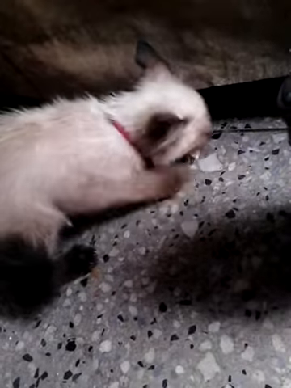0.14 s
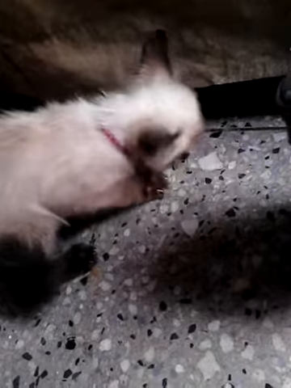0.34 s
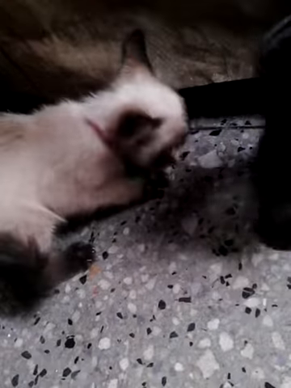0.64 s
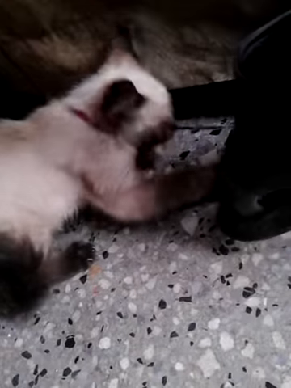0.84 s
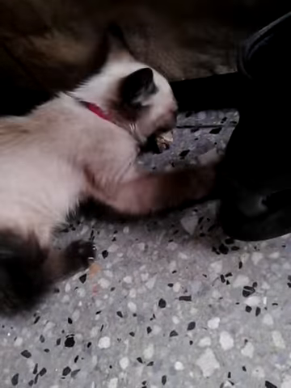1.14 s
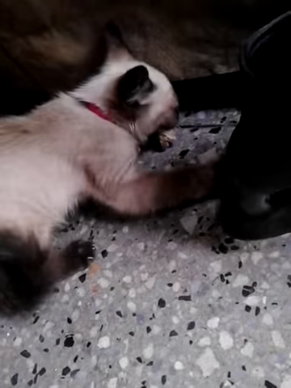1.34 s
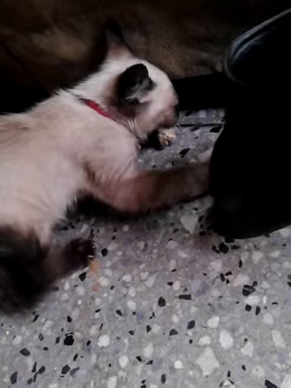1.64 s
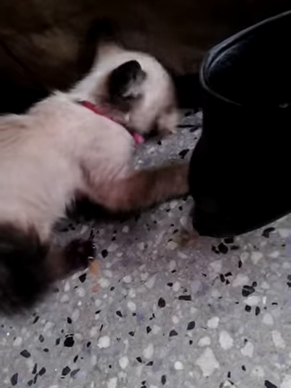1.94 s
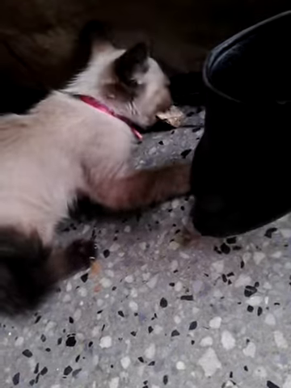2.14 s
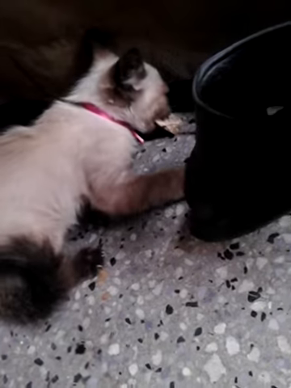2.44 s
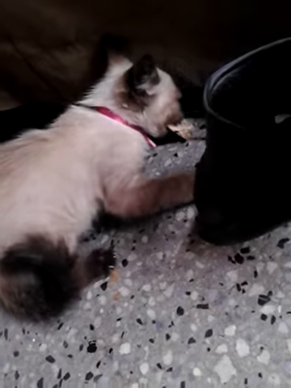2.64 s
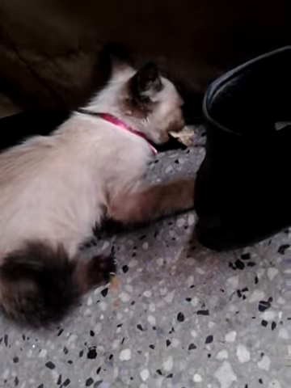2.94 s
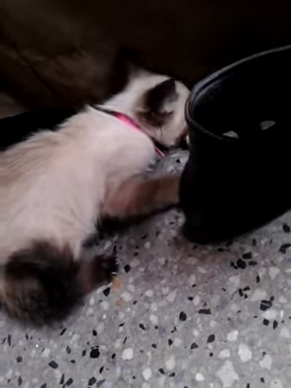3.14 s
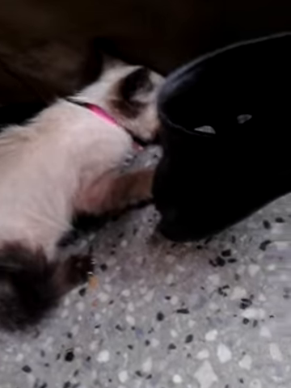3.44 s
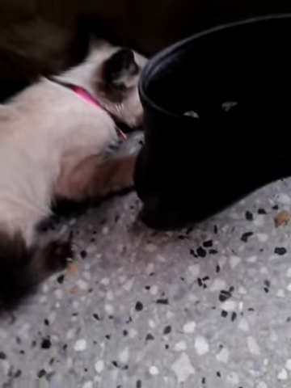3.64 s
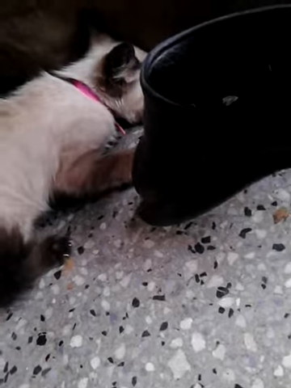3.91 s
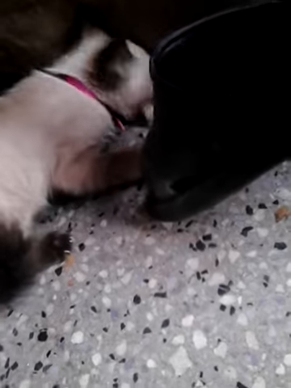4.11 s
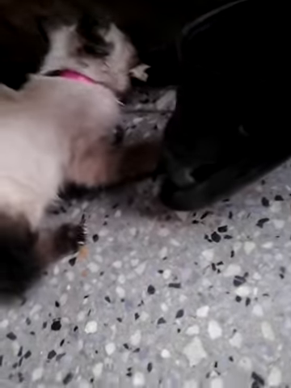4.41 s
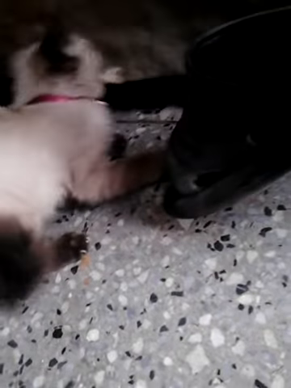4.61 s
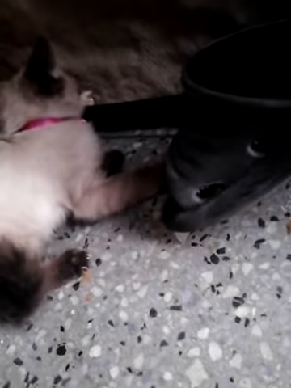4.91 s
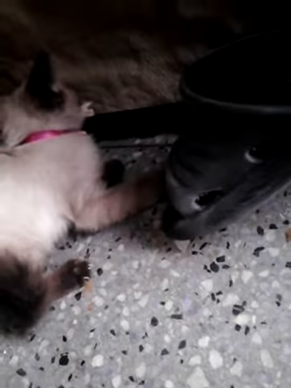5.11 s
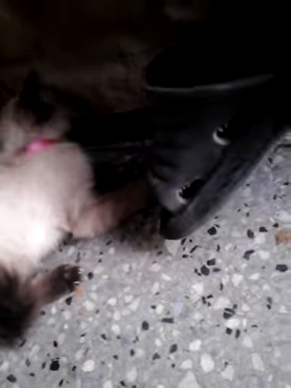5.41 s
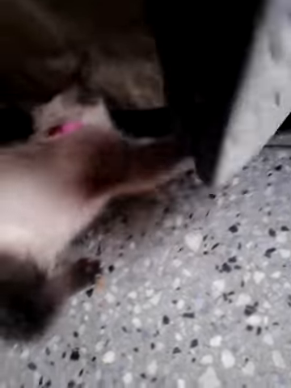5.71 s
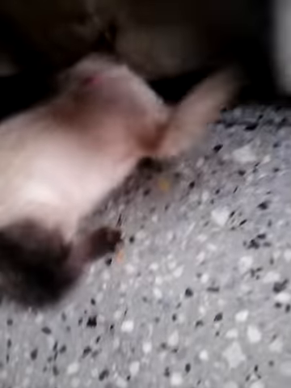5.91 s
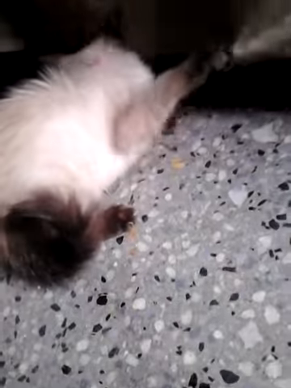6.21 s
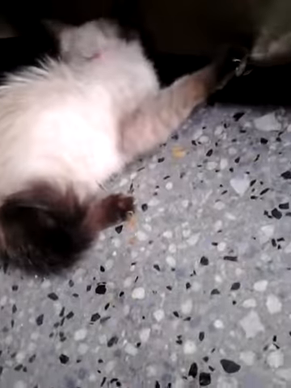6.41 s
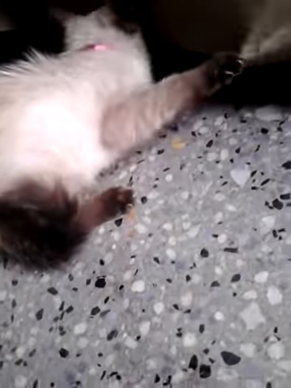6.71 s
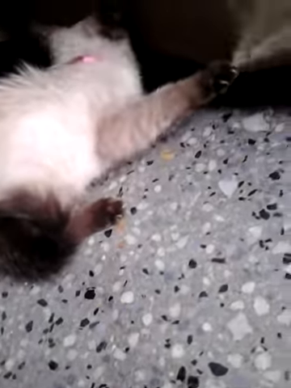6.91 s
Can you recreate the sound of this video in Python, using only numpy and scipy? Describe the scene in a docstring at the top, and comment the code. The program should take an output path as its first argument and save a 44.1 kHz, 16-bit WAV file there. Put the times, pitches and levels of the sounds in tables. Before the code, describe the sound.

Close, high-pitched kitten growls slide between whine and rough snarl, over soft room air, faint taps and an occasional low hum.

```python
"""A kitten gives five wavering growls, close up, guarding its food on a stone floor.
Pulses from its vocal folds ring chest, throat, nose and mouth; the voice slides between a clean whine,
a period-doubled snarl and a rough rasp as the jaw opens and shuts. Airy whistles come and go.
A boot edges nearer with a scuff, claws and food tick, and a low hum swells now and then.
The small hard room answers softly over a low wash of air."""
import sys
import numpy as np
from scipy import signal
from scipy.fft import rfft, irfft, next_fast_len
from scipy.io import wavfile
from scipy.ndimage import uniform_filter1d, minimum_filter1d

SR = 44100
rng = np.random.default_rng(int(sys.argv[2]) if len(sys.argv) > 2 else 0)


def persist_wave(psi):
    """Save psi, clipped to +-1, as 16-bit WAV."""
    counts = np.round(np.clip(psi, -1, 1) * 32767).astype(np.int16)
    wavfile.write(sys.argv[1], SR, np.atleast_2d(counts).T)


N = 311204
TIME = np.arange(N) / SR

WAVER_DEPTH, WAVER_HZ = .022, 26  # at full roughness
FLUTTER_DB, FLUTTER_HZ = 2, 41.3
NOSE_ROUGH_DB = -34.5  # nasal loss at full roughness

# Vocal folds, one curve per growl: time_s, pitch_hz, roughness
FOLD_CURVES = [
    [(0, 405.7, 0.71), (.13, 405.6, 0.55), (.35, 385, 0.27), (.48, 393, 0.33), (.56, 358.6, 0.5)],
    [(1, 353, .85), (1.1, 400, .6), (1.15, 408, .75), (1.185, 440, .5), (1.26, 410, .65), (1.32, 415, .45),
     (1.375, 409, .65), (1.45, 403, .35), (1.53, 400, .2), (1.6, 408.4, .35), (1.645, 397, .9),
     (1.675, 388, .35), (1.72, 403.2, .25), (1.762, 388, .65), (1.81, 404.6, .2), (1.89, 383, .75),
     (2, 416, .45), (2.06, 462, .5), (2.16, 431, .58), (2.21, 398, .6), (2.25, 386, .35), (2.35, 335, .95),
     (2.5, 289.2, .8)],
    [(2.97, 283.5, .85), (3.1, 326.4, 1), (3.3, 351.8, 0.7), (3.36, 378.2, 0.5), (3.4, 384.8, 0.8),
     (3.48, 399.6, .22), (3.62, 399, .1), (3.8, 396.6, .09), (4.13, 399, .07), (4.16, 392, .3),
     (4.19, 382, 0.7), (4.26, 398.2, 0.8), (4.33, 373.6, 0.8), (4.41, 399.3, .55), (4.47, 373, .5),
     (4.53, 359.7, 0.5), (4.65, 312.2, 1.3)],
    [(5.66, 312.6, 0.7), (5.86, 376, 0.83), (5.95, 390.2, 0.7), (6.08, 380, 0.6), (6.2, 300, 1.3)],
    [(6.8, 305, .5), (6.89, 335, .35), (6.97, 329, .6), (7.056, 322, .55)],
]
# Mouth and throat, one curve per growl: time_s, mouth_db, throat_db, mouth_hz, jaw_opening
MOUTH_CURVES = [
    [(0, -33, -54.5, 1572, 0.5), (.035, -32.5, -59.5, 1700, 0.48), (.14, -54, -52.5, 1400, 1),
     (.25, -71, -39.5, 1320, 0.3), (.324, -47, -28.5, 1260, 0.7), (.337, -28, -42, 1598, 0.67),
     (.415, -26.5, -42.5, 1750, 0.6), (.435, -39.5, -28, 1470, 0.78), (.51, -48.5, -40, 1400, 0.8),
     (.62, -61, -77, 1410, 0.6)],
    [(1.006, -41, -83, 1810, 0.5), (1.028, -26, -46.5, 1800, 0.32), (1.1, -25.5, -42, 1920, 0.71),
     (1.21, -21, -41.5, 1782, 0.61), (1.39, -18.5, -43.5, 1776, 0.41), (1.46, -22.5, -35.5, 1586, 0.36),
     (1.612, -20, -32.5, 1841, 0.32), (1.647, -33, -44.5, 1780, 0.7), (1.67, -20.5, -34.5, 1830, 0.38),
     (1.84, -19.5, -34, 1817, 0.43), (1.93, -22.5, -42.5, 1836, 0.3), (2.04, -24.5, -33, 2050, 0.8),
     (2.085, -22, -32.5, 2196, 0.8), (2.12, -26.5, -39, 1844, 0.57), (2.2, -21, -35.5, 1697, 0.31),
     (2.25, -20.5, -34.5, 1683, 0.2), (2.27, -28, -35, 1643, 0.3), (2.32, -32.5, -32, 1705, 0.25),
     (2.47, -40, -48, 1877, 0.1), (2.55, -49, -43, 1735, 0.4)],
    [(2.97, -77, -61.5, 1840, 0.6), (3.11, -49.5, -36, 1780, 0.5), (3.127, -31, -46.5, 2000, 0.04),
     (3.25, -24.5, -38, 1820, 0.36), (3.335, -23, -34.5, 1875, 0.28), (3.36, -18.5, -35, 1836, 0.19),
     (3.385, -23.5, -50, 1870, 0.36), (3.5, -21.5, -32.5, 1744, 0.26), (3.615, -19, -31.5, 1590, 0.17),
     (3.636, -29.5, -27.5, 1587, 0.7), (3.706, -41, -26, 1630, 0.7), (3.755, -27, -26, 1590, 0.2),
     (3.87, -26, -25, 1596, 0.2), (3.91, -32.5, -26, 1580, 0.2), (4.13, -37, -27, 1600, 0.6),
     (4.15, -20, -32.5, 1630, 0.36), (4.19, -25, -34, 1706, 0.22), (4.262, -18.5, -33.5, 1810, 0.31),
     (4.325, -29, -32.5, 2140, 0.8), (4.37, -31, -39.5, 1880, 0.6), (4.47, -24, -35.5, 1771, 0.13),
     (4.51, -38.5, -35.5, 1650, 0.2), (4.62, -57, -36.5, 1560, 0.04), (4.82, -71, -62, 1780, 0)],
    [(5.68, -56, -59, 1725, 0.04), (5.77, -35.5, -55.5, 1740, 0.08), (5.85, -33.5, -45, 1727, 0.12),
     (5.925, -35.5, -59.5, 1660, 0.38), (5.985, -24, -55, 1464, 0.63), (6.03, -33, -42.5, 1190, 0.2),
     (6.095, -46, -44.5, 1010, 0.03), (6.15, -65, -47.5, 998, 0), (6.24, -88.5, -69, 955, 0.1)],
    [(6.8, -63, -62, 1080, 0.2), (6.95, -100, -35.5, 1090, 0.3), (7.11, -82, -32.5, 1090, 0.2)],
]
# Upper resonance and rasp, one curve per growl: time_s, edge_hz, edge_db, rasp_db
EDGE_CURVES = [
    [(.04, 3560, -54, -71), (.3, 3320, -83.5, -82), (.36, 3270, -50, -50), (.41, 3400, -52.5, -54.5),
     (.46, 3480, -81.5, -68)],
    [(1, 3440, -53, -62), (1.09, 3270, -35.5, -50.5), (1.22, 3562, -39, -50.5), (1.5, 3390, -47, -56.5),
     (1.62, 3590, -42.5, -51), (1.82, 3520, -40.5, -53.5), (1.97, 3970, -48, -59.5),
     (2.035, 3790, -31, -57.5), (2.085, 3760, -33, -54), (2.12, 3630, -61.5, -54), (2.24, 3550, -74.5, -71)],
    [(3.05, 3940, -88, -94), (3.13, 4100, -64, -82.5), (3.21, 3180, -52.5, -82.5), (3.35, 4000, -42, -71.5),
     (3.51, 3650, -44.5, -71), (3.62, 4217, -65, -87.5), (3.79, 4190, -62, -75.5), (3.85, 4160, -41, -70),
     (3.95, 4150, -62, -85.5), (4.12, 4010, -61, -85), (4.17, 4130, -45.5, -85), (4.25, 4100, -45.5, -75),
     (4.31, 3250, -31, -58.5), (4.38, 3177, -50.5, -71), (4.47, 2700, -44.5, -85), (4.6, 2950, -73, -94)],
    [(5.7, 3555, -68, -79), (5.89, 3400, -71.5, -69), (5.935, 4260, -60, -52), (6.12, 4300, -95, -94)],
    [(6.9, 3950, -90, -100)],
]
# One row per growl: chest_db, nose_re_throat_db, throat_width_hz
GROWL_TIMBRES = [(-53, -40, 350), (-43, -42.5, 430), (-43.5, -15.5, 432), (-56.5, -38, 380),
                 (-54, -40.5, 270)]


def growl(fold_curve, mouth_curve, edge_curve, chest_db, nose_db, throat_width_hz):
    """The folds drive chest, throat, nose, mouth and head resonances in parallel."""
    t = span(mouth_curve)
    pitch_hz, rough = follow(fold_curve, t)
    mouth_db, throat_db, mouth_hz, jaw = follow(mouth_curve, t)
    edge_hz, edge_db, rasp_db = follow(edge_curve, t)
    rough, jaw = np.clip(rough, 0, 1), np.clip(jaw, 0, 1)
    # A strained voice cannot hold its pitch.
    pitch_hz = pitch_hz * (1 + WAVER_DEPTH * rough ** 2 * wander(len(t), WAVER_HZ))
    drive = vocal_folds(t, pitch_hz, rough)
    chest = resonate(drive, pitch_hz, width_hz=266)
    throat = throat_ring(drive, pitch_hz, throat_width_hz)
    nose = amp(nose_db + NOSE_ROUGH_DB * rough) * steady(nose_ring(drive))
    voice = (amp(mouth_db) * steady(mouth_ring(drive, mouth_hz, jaw), samples=500)
             + amp(edge_db) * steady(edge_ring(drive, edge_hz))
             + amp(rasp_db) * steady(rasp(drive))
             + amp(throat_db) * (steady(throat) + nose)
             + chest_gain(t, chest_db) * fade(steady(chest), samples=2200))
    flutter = amp(FLUTTER_DB * rough * wander(len(t), FLUTTER_HZ))
    return t[0], fade(voice * flutter)


def vocal_folds(t, pitch_hz, rough, stagger_cycles=0.077):
    """One pulse per cycle. Roughness shakes the pitch, scatters pulses and leaks air."""
    quaver = (.0009 + .034 * rough) * wander(len(t), rate_hz=55)
    phase = np.cumsum(pitch_hz * (1 + quaver)) / SR
    cycles = np.arange(int(t[-1] - t[0] + 1) * 500)
    timing, strength = (np.interp(phase, cycles, row) for row in rng.standard_normal((2, len(cycles))))
    jitter = .05 * rough ** 1.6 * timing
    shimmer = 1 + .5 * rough ** 1.5 * strength
    phase = phase + jitter + stagger_cycles * snarl(t, rough) * np.cos(np.pi * phase)
    pulses = unit(sum(np.cos(2 * np.pi * k * phase) for k in range(1, 21)))
    puffs = (1 + np.cos(2 * np.pi * phase)) * rng.standard_normal(len(t))  # air through open folds
    return pulses * shimmer + .3 * (rough ** 1.5 + .025) * puffs


# Period-doubled stretches: start_s, length_s, depth
SNARLS = [(-.05, 0.19, 0.46), (1.162, 0.29, 0.89), (1.493, 0.1, .55), (2.25, 0.19, 0.66),
          (3.168, 0.163, 0.59), (3.411, 0.22, 0.32), (4.215, 0.28, 0.81), (5.952, 0.072, 0.68)]


def snarl(t, rough, ramp_s=0.043):
    """Depth of period doubling: the folds' pulses limp in pairs."""
    doubling = sum(depth * np.clip(np.minimum(t - start_s, start_s + length_s - t) / ramp_s, 0, 1)
                   for start_s, length_s, depth in SNARLS)
    return .16 * rough + doubling


def mouth_ring(drive, mouth_hz, jaw):
    """An opening jaw damps the mouth resonance, crossfading through five fixed widths."""
    target_width_hz = 166 + 776 * jaw
    widths_hz = np.geomspace(200, 1000, 5)
    ring = sum(np.interp(target_width_hz, widths_hz, share) * resonate(drive, mouth_hz, width_hz)
               for width_hz, share in zip(widths_hz, np.eye(len(widths_hz))))
    return colour(ring, [(700, -16.5), (1130, -12), (1400, 3), (1720, -9.5), (2030, -2),
                         (2280, -9), (2500, 8), (2780, -1), (3100, -9), (4500, -25)])


def throat_ring(drive, pitch_hz, width_hz):
    """The throat resonance tracks the pitch, near the second harmonic."""
    ring = resonate(drive, 1.613 * pitch_hz + 150, width_hz)
    return colour(ring, [(400, 0.5), (530, -10.5), (650, -0.5), (800, 0.5), (900, 4), (1050, -4)])


def nose_ring(drive):
    """Two fixed nasal resonances brighten the clean whine."""
    return resonate(drive, hz=4182, width_hz=261.4) + amp(-10.5) * resonate(drive, hz=2360, width_hz=250)


def edge_ring(drive, edge_hz):
    """A gliding upper resonance, with its reflection off the floor."""
    ring = floor_bounce(resonate(drive, edge_hz, width_hz=640))
    return colour(ring, [(1500, -22.5), (2900, 1), (4800, -5), (6600, -11.5)])


def floor_bounce(x, delay_s=0.0015663, gain_db=-9):
    """One reflection off the stone ripples the spectrum."""
    index = np.arange(len(x))
    return x + amp(gain_db) * np.interp(index - delay_s * SR, index, x, left=0)


# Head resonances: centre_hz, width_hz, gain_db
HEAD_MODES = [(4560, 640, 7), (5570, 310, 2), (6330, 380, -6), (7570, 980, -19), (8900, 1200, -20)]


def rasp(drive, drift=.03, sway_db=3.5):
    """The top of the voice rings in the head; each resonance drifts and swells on its own."""
    ring = np.zeros(len(drive))
    for centre_hz, width_hz, gain_db in HEAD_MODES:
        gain = amp(gain_db + sway_db * wander(len(drive), rate_hz=22))
        hz = centre_hz * (1 + drift * wander(len(drive), rate_hz=15))
        ring += gain * resonate(drive, hz, width_hz)
    return ring


# Chest grumbles: start_s, hold_s, level_db
GRUMBLES = [(1.187, 0.69, -40.5), (2.172, 0.025, -40.5), (2.36, 0.054, -36.5), (3.118, 0.03, -34),
            (3.267, 0.037, -39.5), (4.634, 0.069, -40.5), (6.917, 0.077, -37.5)]


def chest_gain(t, rest_db, ramp_s=.05, ramp_db=14, shake_db=2.5):
    """A weak steady gain, plus shaking grumbles where the voice drops into the chest."""
    gain = amp(rest_db)
    for start_s, hold_s, level_db in GRUMBLES:
        outside_s = np.maximum(np.maximum(start_s - t, t - start_s - hold_s), 0)
        shaken_db = level_db + shake_db * wander(len(t), FLUTTER_HZ)
        gain = gain + amp(shaken_db - ramp_db * outside_s / ramp_s)
    return gain


# Airy whistles: start_s, length_s, first_hz, last_hz, width_hz, level_db
WHISTLES = [(0.31, 0.156, 6250, 6440, 350, -65), (0.664, 0.67, 5600, 6770, 347, -67),
            (0.738, 0.28, 4810, 4782, 80, -58), (3.199, 0.391, 5340, 4900, 450, -60),
            (3.711, 0.3, 5610, 5840, 311.4, -55), (3.737, 0.18, 4533, 4903, 280, -52.5),
            (3.755, 0.1857, 1874, 1830, 200, -40.5), (5.014, 0.227, 6640, 6650, 151, -71.5),
            (5.611, 0.514, 5530, 5500, 247, -70)]


def whistle(start_s, length_s, first_hz, last_hz, width_hz, level_db):
    """Noise through a narrow gliding resonance."""
    count = round(length_s * SR)
    tone = resonate(rng.standard_normal(count), np.linspace(first_hz, last_hz, count), width_hz)
    return start_s, amp(level_db) * fade(unit(tone), samples=3000)


# Scuff envelope: time_s, level_db
SCUFF_ENVELOPE = [(0.55, -76), (0.626, -58), (0.74, -60.5), (.88, -55), (1.02, -49)]
# Scuff spectrum: frequency_hz, density_db
SCUFF_SPECTRUM = [(1180, -39), (2100, -21), (2950, -19), (3220, -12.5), (3540, -21.5), (4450, -11),
                  (4790, -15), (5100, -18), (6540, -24), (7600, -44.5), (16300, -85)]


def boot_scuff(rise_db_per_s=200, fall_db_per_s=45):
    """A boot slides with uneven grip: a dry hiss that dies away under the second growl."""
    level_db, = follow(SCUFF_ENVELOPE, TIME)
    level_db -= rise_db_per_s * np.maximum(SCUFF_ENVELOPE[0][0] - TIME, 0)
    level_db -= fall_db_per_s * np.maximum(TIME - SCUFF_ENVELOPE[-1][0], 0)
    grip_db = 1.3 * wander(N, rate_hz=40)
    return amp(level_db + grip_db) * unit(colour(rng.standard_normal(N), SCUFF_SPECTRUM))


# Claw and food taps: start_s, level_db (before boost), ring_hz, crisp_gain_db
TAPS = [(0.604, -52.5, 3680, -54), (4.048, -56, 3430, -30)]


def tap(start_s, level_db, ring_hz, crisp_gain_db, t60_s=0.12, boost_db=15.5):
    """A claw or a bit of food taps: a short gritty ring with a crisp top."""
    t = np.arange(SR // 5) / SR
    grit = rng.standard_normal(len(t)) * amp(-60 * t / t60_s)
    ring = resonate(grit, ring_hz, width_hz=860) + amp(crisp_gain_db) * grit
    return start_s, amp(level_db + boost_db) * ring / np.abs(ring).max()


def crumbs(rate_per_s=4, level_db=-75, spread_db=3, t60_s=.02):
    """Food and grit tick faintly at random moments."""
    peaks = amp(level_db + spread_db * np.minimum(rng.exponential(1, N), 2))
    impacts = peaks * (rng.random(N) < rate_per_s / SR)
    t = np.arange(SR // 20) / SR
    tick = np.diff(rng.standard_normal(len(t)) * amp(-60 * t / t60_s))
    return signal.oaconvolve(impacts, tick / np.abs(tick).max())[:N]


# Hum swells: peak_s, rise_s, fall_s, level_db, pitch_hz
HUMS = [(3.839, 0.25, 0.22, -30.5, 146.5), (4.866, 0.74, 0.13, -31.5, 138.4), (6.32, 0.29, 0.068, -44, 156),
        (6.832, 0.3, 0.028, -41.5, 121.7)]


def hum(peak_s, rise_s, fall_s, level_db, pitch_hz, range_db=21.5, rumble_gain_db=-15):
    """A low fluttering tone in a dull rumble swells and fades."""
    t = np.arange(-rise_s, fall_s, 1 / SR)
    swell = amp(level_db - range_db * np.maximum(-t / rise_s, t / fall_s))
    tone = unit(np.sin(2 * np.pi * pitch_hz * t) * (1 + 0.43 * wander(len(t), rate_hz=59)))
    rumble = colour(rng.standard_normal(len(t)),
                    [(20, -12.5), (70, 2), (130, -19.5), (220, 6), (400, -10), (9000, -110)])
    return peak_s - rise_s, fade(swell * (tone + amp(rumble_gain_db) * unit(rumble)))


# Room decay: frequency_hz, t60_s
ROOM_DECAY = [(200, 0.24), (4000, 0.32), (9000, 0.006)]


def room(x, reflections_per_s=2500, gap_s=.003):
    """Sparse reflections of random sign; each band decays at its own rate."""
    count = SR * 2 // 3
    signs = rng.choice([-1., 1.], count)
    arrivals = (rng.random(count) < reflections_per_s / SR) * (np.arange(count) > gap_s * SR)
    hz, t, bands = signal.stft(signs * arrivals, SR, nperseg=256)
    decay = amp(-60 * t / at_hz(ROOM_DECAY, hz)[:, None])
    tail = signal.istft(bands * decay, SR, nperseg=256)[1]
    return signal.fftconvolve(x, tail / np.linalg.norm(tail))[:N]


# Room air spectrum: frequency_hz, density_db
AIR_SPECTRUM = [(25, -35.5), (42, -20), (102, -11.5), (139, -2.5), (350, -11.5), (1100, -23.5), (1580, -22),
                (2600, -31.5), (3810, -35), (6910, -45), (7420, -58), (9650, -79.5), (16300, -120)]


def air(level_db=-50.5, hiss_db=-88):
    """A low, slightly swelling wash of room air, plus faint microphone hiss."""
    swell_db = 1.2 * wander(N, rate_hz=9)
    hiss = amp(hiss_db) * rng.standard_normal(N)
    return amp(level_db + swell_db) * unit(colour(rng.standard_normal(N), AIR_SPECTRUM)) + hiss


def amp(db):
    """Decibels to gain."""
    return 10 ** (np.asarray(db) / 20)


def unit(x):
    """Scales to rms 1."""
    return x / np.sqrt(np.mean(x ** 2) + 1e-20)


def steady(x, samples=900):
    """Holds the short-term rms at 1, keeping faster flutter."""
    power = uniform_filter1d(uniform_filter1d(x ** 2, samples), samples)
    return x / np.sqrt(np.abs(power) + 1e-14)


def follow(curve, t):
    """A curve's columns at times t."""
    time_s, *columns = np.transpose(curve)
    return [np.interp(t, time_s, column) for column in columns]


def at_hz(points, hz):
    """Interpolates on a log-frequency axis."""
    frequency_hz, values = np.transpose(points)
    return np.interp(np.log(hz + 1), np.log(frequency_hz), values)


def span(curve):
    """Sample times from first row to last."""
    return np.arange(curve[0][0], curve[-1][0], 1 / SR)


def add(mix, start_s, sound):
    """Mixes a sound in at start_s."""
    part = mix[max(round(start_s * SR), 0):][:len(sound)]
    part += sound[:len(part)]


def fade(x, samples=300):
    """Tapers both ends."""
    return x * signal.windows.tukey(len(x), 2 * samples / len(x))


def colour(x, points):
    """Equalises by points of frequency_hz, gain_db."""
    size = next_fast_len(len(x) + 2048)
    gain = amp(at_hz(points, np.fft.rfftfreq(size, 1 / SR)))
    return irfft(rfft(x, size) * gain, size)[:len(x)]


def wander(count, rate_hz):
    """Smooth random motion, rms 1."""
    hz = np.fft.rfftfreq(count, 1 / SR)
    return unit(irfft(rfft(rng.standard_normal(count)) * np.exp(-(hz / rate_hz) ** 2), count))


def resonate(x, hz, width_hz):
    """Steep unity-gain resonance; hz may glide."""
    carrier = np.exp(2j * np.pi * np.cumsum(hz * np.ones(len(x))) / SR)
    lowpass = signal.butter(3, width_hz / 2, fs=SR, output="sos")
    return 2 * (carrier * signal.sosfilt(lowpass, x / carrier)).real


def scene():
    """Growls, whistles and taps with room echo, over hums, scuff, crumbs and air."""
    near, hums = np.zeros(N), np.zeros(N)
    for *curves, timbre in zip(FOLD_CURVES, MOUTH_CURVES, EDGE_CURVES, GROWL_TIMBRES):
        add(near, *growl(*curves, *timbre))
    for row in WHISTLES:
        add(near, *whistle(*row))
    for row in TAPS:
        add(near, *tap(*row))
    for row in HUMS:
        add(hums, *hum(*row))
    echo = amp(-9.5) * colour(room(near), [(800, 0), (1500, -0.5)])
    return fade(near + echo + hums + boot_scuff() + crumbs() + air(), samples=100)[None]


def record(dry, ceiling_db=-11.0, cutoff_hz=15500):
    """Fast peak limiter, then a low-pass."""
    gain = np.minimum(amp(ceiling_db) / (np.abs(dry) + 1e-9), 1)
    limited = dry * uniform_filter1d(minimum_filter1d(gain, size=400), size=400)
    lowpass = signal.firwin(511, cutoff_hz, window=("kaiser", 9), fs=SR)
    return signal.oaconvolve(limited, lowpass[None], "same")


dry = scene()
out = record(dry)
persist_wave(out)
```